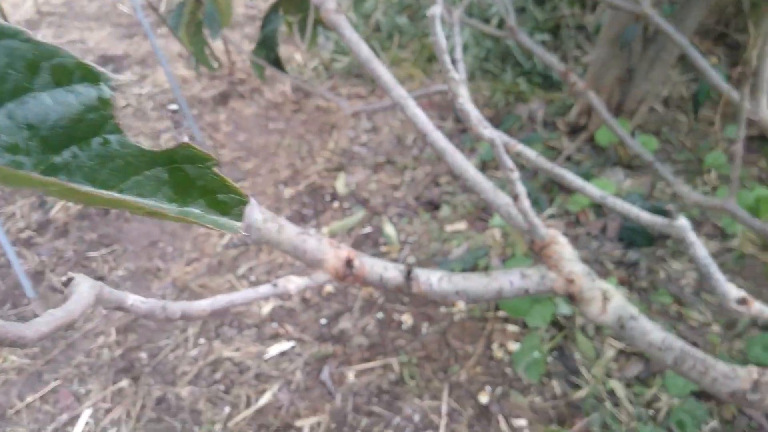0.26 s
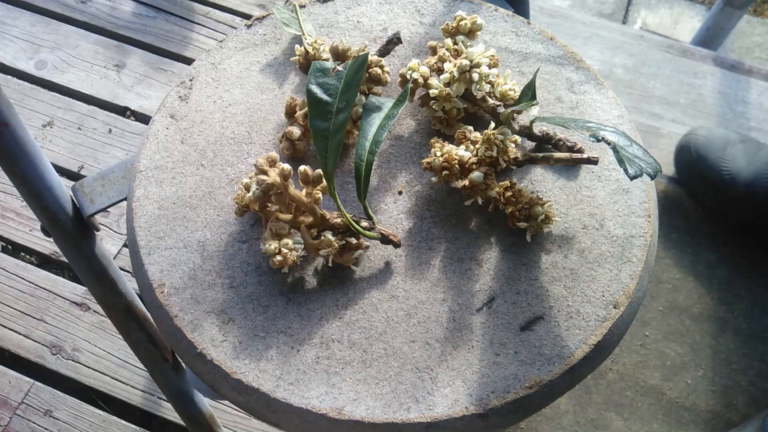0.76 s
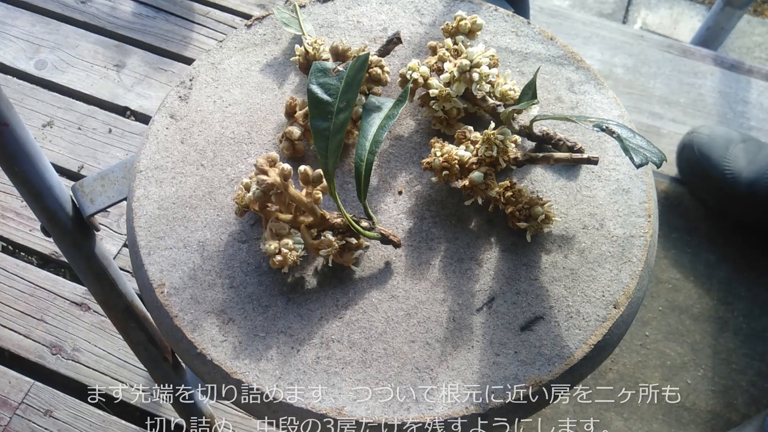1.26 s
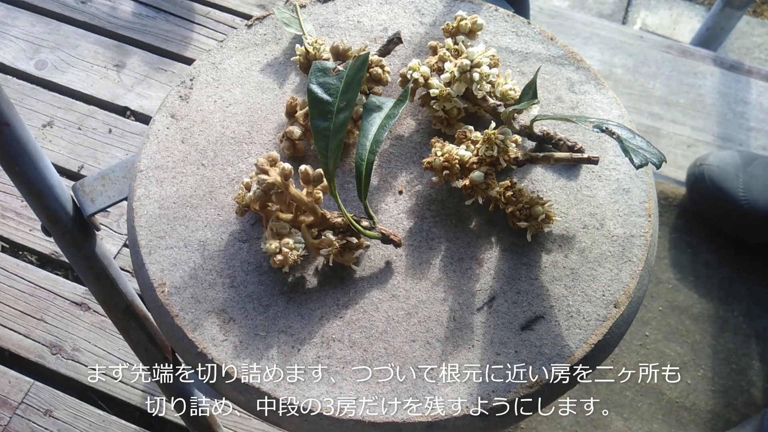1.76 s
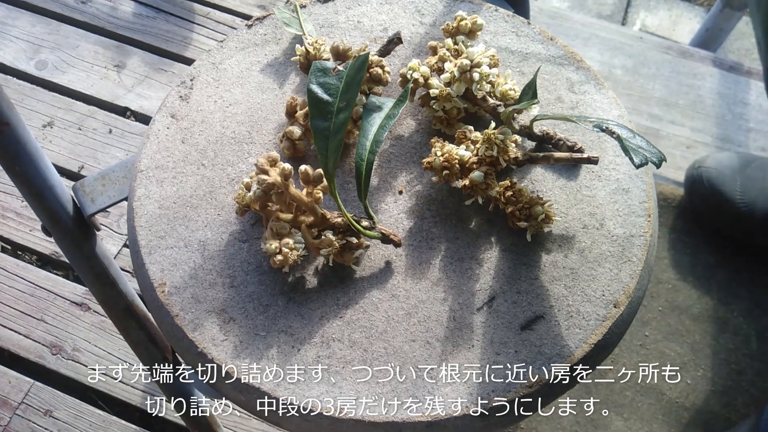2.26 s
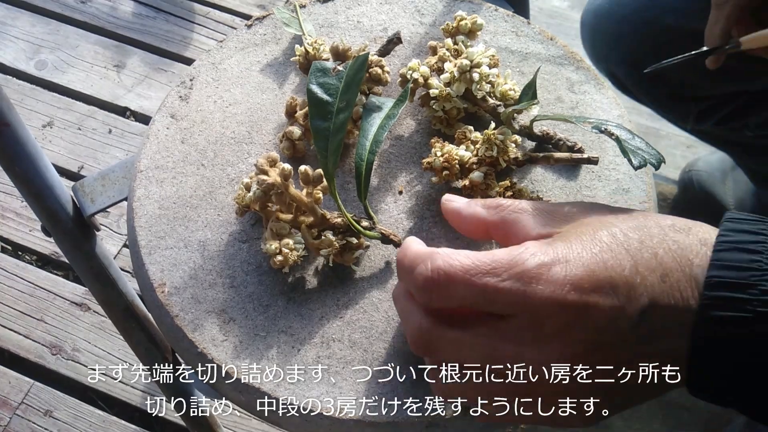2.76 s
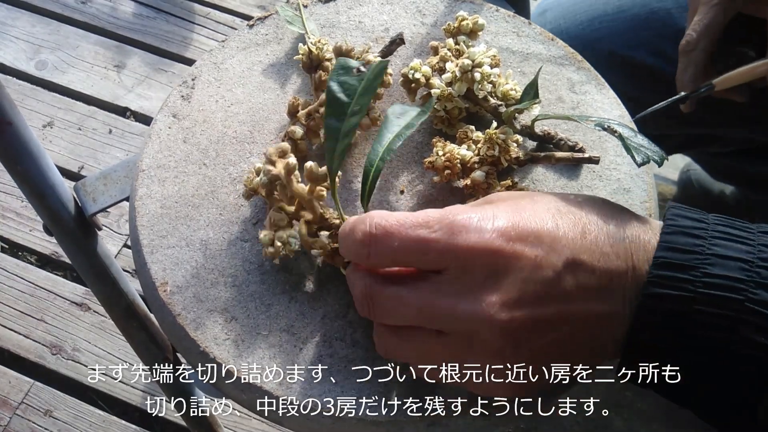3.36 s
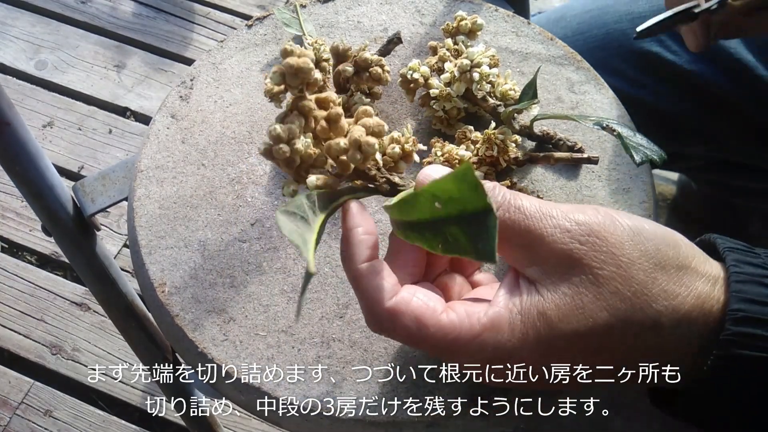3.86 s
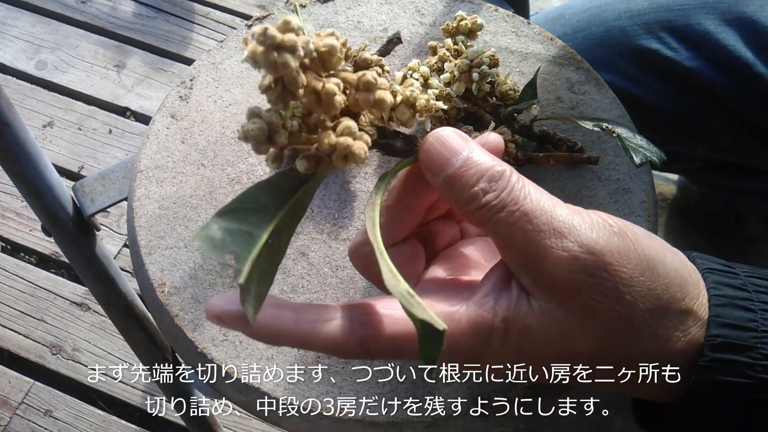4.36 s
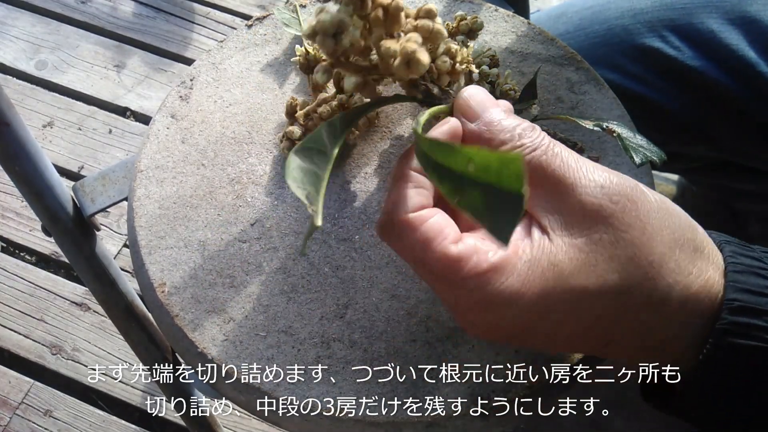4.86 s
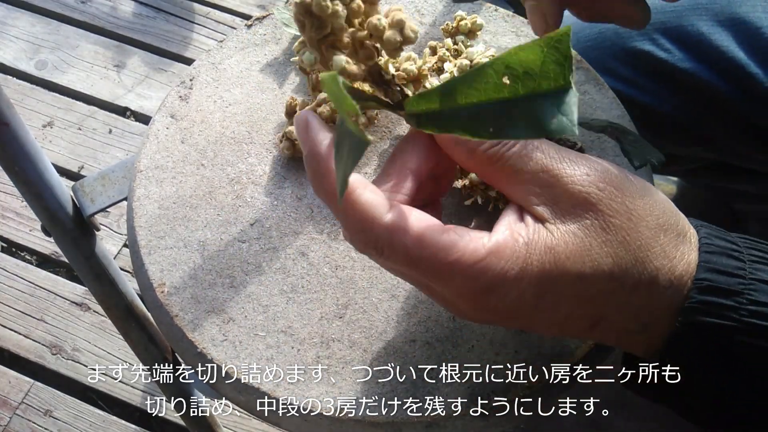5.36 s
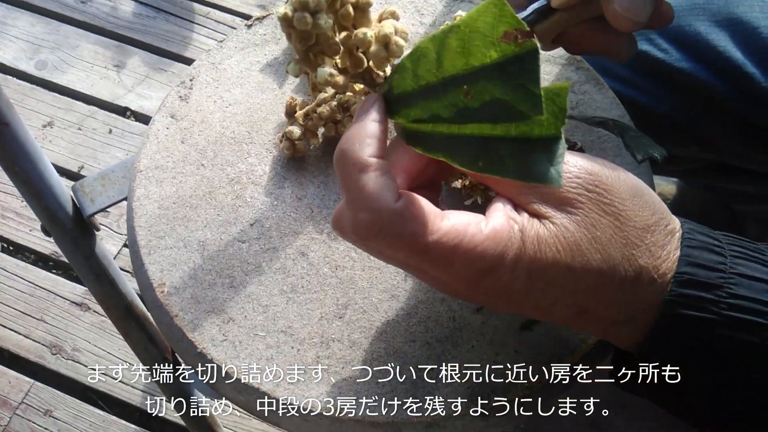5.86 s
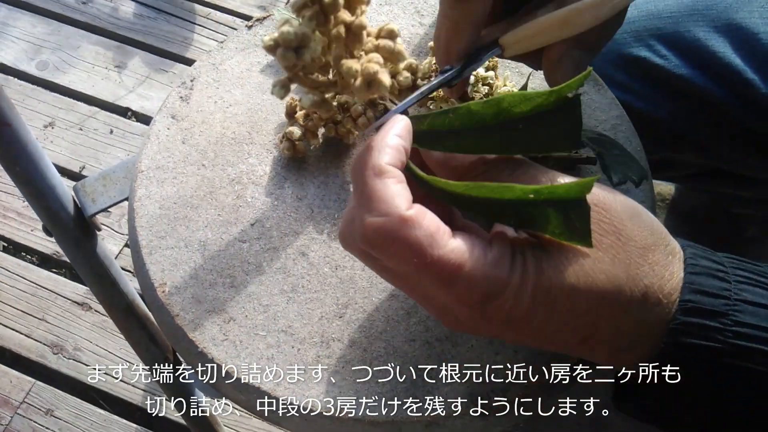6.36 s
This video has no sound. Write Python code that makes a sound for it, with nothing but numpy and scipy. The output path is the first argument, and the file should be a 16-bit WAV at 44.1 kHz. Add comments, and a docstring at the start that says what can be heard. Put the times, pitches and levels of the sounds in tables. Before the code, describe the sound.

Faint garden air drops out and gives way to a louder outdoor hiss and hum, with low wind puffs on the microphone. Close by, the wooden handles of small shears clack, something softly bumps the table, and the shears clack again. Crisp, uneven snaps follow as a flower cluster is trimmed, mixed with light leaf rustling, another gust and a softer clack.

```python
"""Small garden shears trim a flower cluster at an outdoor stone table. Wooden handles clack off to the
right; stems snap fibre by fibre, leaves rustle in the hand, and the deck and house wall answer briefly.
Underneath, quiet garden air fades out, then the louder air of the deck fades in. Puffs of wind touch
the left microphone, something soft bumps the table, and a far bird gives one note at the end."""
import sys
import numpy as np
from scipy import signal
from scipy.fft import rfft, irfft, next_fast_len
from scipy.io import wavfile
from scipy.ndimage import uniform_filter1d, map_coordinates

SR = 44100
rng = np.random.default_rng(int(sys.argv[2]) if len(sys.argv) > 2 else 0)


def master_out(mix):
    """Clip the mix to full scale and print it as 16-bit PCM to the path in sys.argv[1]."""
    frames = np.transpose(np.atleast_2d(mix))
    ceiling = np.clip(frames, -1, 1)
    pcm = np.round(ceiling * 32767).astype(np.int16)
    wavfile.write(sys.argv[1], SR, pcm)


N = 291060
TIME = np.arange(N) / SR
RING = np.arange(SR // 3) / SR  # time within one short event [s]


def amp(db):
    """Decibels to gain."""
    return 10 ** (np.asarray(db) / 20)


def pan(db):
    """Stereo gains with the left side db louder than the right."""
    return amp([[db / 2], [-db / 2]])


def unit_rms(x):
    """x at rms 1."""
    return x / np.sqrt(np.mean(x ** 2) + 1e-20)


def unit_energy(x):
    """Each channel at energy 1."""
    return x / np.linalg.norm(x, axis=-1, keepdims=True)


def along(points, hz):
    """Read a curve of (frequency [Hz], value) points on a log axis."""
    freqs, values = np.transpose(points)
    return np.interp(np.log(hz + 1), np.log(freqs), values)


def hump(s, length):
    """A smooth rise and fall, 1 at s seconds."""
    return np.exp(-((TIME - s) / length) ** 2)


def wobble(rate):
    """A smooth random drift, rate knots a second."""
    return map_coordinates(rng.standard_normal(int(N * rate / SR) + 4), [TIME * rate])


def filtered(x, response):
    """EQ x with a response given as a function of frequency."""
    n = x.shape[-1]
    padded = next_fast_len(n + 8192, real=True)
    return irfft(rfft(x, padded) * response(np.fft.rfftfreq(padded, 1 / SR)), padded)[..., :n]


def causal(gain):
    """The minimum-phase response with this gain: no ringing ahead of the attack."""
    cepstrum = irfft(np.log(gain + 1e-6))
    half = len(cepstrum) // 2
    return np.exp(rfft(np.r_[cepstrum[0], 2 * cepstrum[1:half]], 2 * half))


def whiten(x, width_hz=220):
    """Even out a burst's tone so every band has about the same energy; this can sharpen its attack."""
    spectrum = rfft(x)
    bins = max(3, int(width_hz * x.shape[-1] / SR))
    power = abs(uniform_filter1d(abs(spectrum) ** 2, bins))
    return unit_energy(irfft(spectrum / np.apply_along_axis(causal, -1, np.sqrt(power))))


def add(track, s, sound):
    """Mix a sound in at s seconds."""
    part = track[:, round(s * SR):][:, :sound.shape[-1]]
    part += sound[..., :part.shape[1]]


def coloured(x, spectrum, body_db, fizz_db):
    """Thick, soft things add body below 2 kHz; thin, brittle ones add fizz above 8 kHz."""
    body = lambda hz: body_db * along([(1950, 0.85), (2900, 0.0078)], hz)
    fizz = lambda hz: fizz_db * along([(8100, 0.02), (9100, 1.0)], hz)
    return filtered(x, lambda hz: causal(amp(along(spectrum, hz) + body(hz) + fizz(hz))))


def placed(x, pan_db, lag, near_db, echo_db, t60):
    """Direct sound (left ear lag s late), quick bounces off hands, table and deck, and a short echo."""
    direct = np.zeros((2, len(RING)))
    direct[0, round(abs(lag) * SR)] = direct[1, 0] = 1
    near = unit_energy(rng.standard_normal(direct.shape) * RING * np.exp(-RING / 0.0016))
    tail_envelope = amp(-60 * RING / t60) * (1 - np.exp(-RING / 0.0025))
    tail = whiten(rng.standard_normal(direct.shape) * tail_envelope)
    tail_eq = [(300, 1.5), (2000, 3), (8000, 4.0), (14000, 2.0)]
    tail = filtered(tail, lambda hz: causal(amp(along(tail_eq, hz))))
    paths = whiten(direct + amp(echo_db) * (amp(near_db) * near + tail))
    return signal.fftconvolve(x[None], paths, axes=1) * pan(pan_db)


def noise_bed(spectrum, pan_db, lag=.00036):
    """Stereo noise of rms 1, narrow in the low mids and wide elsewhere, the left side lag s late."""
    # likeness of the two sides: (frequency [Hz], correlation [0-1])
    likeness = [(30, 0.2), (120, 0.69), (270, 0.95), (600, 0.84), (1200, 0.018), (10000, 0)]
    spread = lambda hz: np.arccos(np.clip(along(likeness, hz), -1, 1)) / 2
    mid_side_eq = lambda hz: amp(along(spectrum, hz)) * [np.cos(spread(hz)), np.sin(spread(hz))]
    mid, side = filtered(rng.standard_normal((2, N)), mid_side_eq)
    left = np.roll(mid + side, round(lag * SR))
    return unit_rms(np.array([left, mid - side]) * pan(pan_db))


def air(gain_db=2):
    """Rumble and distant hum under a smooth hiss; the garden fades out, a gap, then the deck fades in."""
    # tone of each outdoor layer: (frequency [Hz], level [dB])
    rumble_eq = [(15, -7.5), (45, 3), (85, -6.5), (125, -3), (190, -10.5), (350, -29.5), (1500, -41.5)]
    hum_eq = [(40, -22), (140, -7), (200, -5), (275, 0.5), (340, -3), (450, -5.5), (600, -9), (790, -6),
              (1050, -15), (2500, -21.5), (8000, -64)]
    hiss_eq = [(20, -12), (400, -13), (1000, -1.5), (2000, 1.5), (4000, 0), (6000, -2), (8200, 1),
               (8700, -5.5), (15500, -7)]
    # base mix of the air in each place: (rumble [dB], hum [dB], hiss [dB])
    garden_mix = (-78, -74, -74)
    deck_mix = (-58.5, -61.5, -61.5)
    garden = np.interp(TIME, [.67, .70], [1, 0])
    deck = np.interp(TIME, [.756, .759, .84, .96], [0, .28, .48, 1])
    rumble_fade, hum_fade, hiss_fade = (garden * amp(garden_db) + deck * amp(deck_db)
                                        for garden_db, deck_db in zip(garden_mix, deck_mix))
    # the rumble is weak until the breeze sets in, and builds towards the second gust
    calm_db = np.interp(TIME, [.7, .76, .96, 1.03], [0, -3, -5.5, -0.5])
    rumble = amp(calm_db + 3.3 * hump(4.0, 1.0) + 1.44 * wobble(5.3)) * noise_bed(rumble_eq, pan_db=3)
    # hum and hiss each swell once and ebb
    hum = amp(3.5 * hump(5.56, 0.96) + 0.98 * wobble(9.8)) * noise_bed(hum_eq, pan_db=-2.5)
    hiss = amp(2.5 * hump(2.68, 1.17) + 0.45 * wobble(7.1)) * noise_bed(hiss_eq, pan_db=0.35)
    return amp(gain_db) * (rumble_fade * rumble + hum_fade * hum + hiss_fade * hiss)


def bird(s=6.505, pitch_hz=3450, db=-61, length=0.014):
    """One faint whistled note from far off in the garden."""
    return amp(db - 12.0 * ((TIME - s) / length) ** 2) * np.sin(2 * np.pi * pitch_hz * TIME)


def gust_push(s=1.029, rise=0.18, push_db=-29.5, pan_db=-5):
    """The first gust presses on the microphones, a deep push that slowly lets go."""
    age = np.maximum(TIME - s, 0) / rise
    return amp(push_db) * age * np.exp(1 - age) * pan(pan_db)


def wind_puffs(lee_db=-17, usual_length=0.04):
    """Each puff shakes the left microphone; the right one lies in the lee."""
    # wind on the microphone: (time [s], level [dB], length [s])
    puffs = [(0.831, -48, 0.021), (1.12, -45, 0.16), (1.225, -31, 0.015), (1.283, -37, 0.043),
             (4.465, -32, .033), (4.496, -28.5, 0.024), (4.51, -41, .17), (4.783, -44, 0.062)]
    # tone of a long puff: (frequency [Hz], level [dB])
    buffet_eq = [(15, -29), (45, 11), (80, 1.5), (140, -1.5), (230, -17), (330, -30), (550, -56),
                 (2000, -90)]
    out = np.zeros((2, N))
    for s, db, length in puffs:
        size = min(length / usual_length, 1) ** .3  # a short puff reaches higher in pitch
        eddies = filtered(rng.standard_normal((2, len(RING))), lambda hz: amp(along(buffet_eq, hz * size)))
        envelope = np.exp(-((RING - RING.mean()) / (0.64 * length)) ** 2)
        puff = unit_energy(eddies * envelope) * np.sqrt(length * SR)
        add(out, s - RING.mean(), amp(db) * puff)
    return out * amp([[0], [lee_db]])


def table_bumps(gain_db=27):
    """Something soft jostles the table, ringing its modes at slightly new strengths each time."""
    # soft hits: (time [s], relative level [dB])
    bumps = [(1.7640, -41), (1.7747, -39.5), (1.7819, -44)]
    # modes of the table: (frequency [Hz], level [dB], t60 [s])
    modes = [(128.5, 0, 0.074), (183, -3, 0.062), (219, 1, 0.053), (286, 0.5, 0.12), (510, -4, .05),
             (676, -2.5, 0.023), (1140, -24, 0.024)]
    out = np.zeros((2, N))
    for s, db in bumps:
        partials = (amp(mode_db + rng.standard_normal() - 60 * RING / t60)
                    * np.sin(2 * np.pi * (hz * RING + rng.random())) for hz, mode_db, t60 in modes)
        thud = unit_energy(sum(partials))
        heard = placed(thud, pan_db=-3.0, lag=0.00029, near_db=-6, echo_db=-20, t60=0.12)
        add(out, s, amp(db + gain_db) * heard)
    return filtered(out, lambda hz: causal(amp(along([(800, -2), (1500, 7.0), (5000, -25)], hz))))


def leaf_rustle(grains_per_s=2500):
    """Leaves and buds rub in the hand: fine grains that come in small clumps and swell with each stroke."""
    # the hand shifts the cluster: (time [s], level [dB], length [s])
    strokes = [(3.243, -62, 0.054), (3.76, -56.5, 0.091), (4.025, -52, 0.013), (4.279, -54, .02),
               (5.125, -52, 0.023), (5.456, -61, 0.14), (6.22, -53.5, 0.12)]
    # tone of rubbing leaves: (frequency [Hz], level [dB])
    leaf_eq = [(200, 10.5), (900, 8), (2200, 3), (4500, 4), (8000, -2), (9000, -7), (15000, -6)]
    grains = rng.standard_normal((2, N)) * (rng.random(N) < grains_per_s / SR)
    clumps = amp(4 * np.tanh(wobble(22)) + 4 * np.tanh(wobble(140)))
    power = sum(amp(db) ** 2 * hump(s, length) for s, db, length in strokes)
    return np.sqrt(power) * unit_rms(filtered(grains * clumps, lambda hz: amp(along(leaf_eq, hz))))


def stem_snaps(gain_db=25, usual_hz=6040, ring_db=6.5, ring_width=0.39):
    """A stem gives way in a quick volley of breaking fibres and rings at its own pitch."""
    # stems and buds snapping; the 3.0117 s row is the bright echo of the snap just before:
    # (time [s], relative level [dB], pan left [dB], tearing time [s], pitch [Hz], body [dB], echo [dB])
    snaps = [(0.558, -68, 4, 0.00036, 6960, 8, -11), (2.6911, -45, 1, 0.0013, 2200, 2, -2),
             (2.86, -53, -2, 0.00057, 4000, -5, -1), (3.008, -31.5, -0.5, .00021, 3800, -11, 1.5),
             (3.0117, -38.5, 9, 0.00052, 7400, -19, 13), (3.5679, -21, -3.5, .00013, 4160, -3.5, -5),
             (4.0311, -38, -6.5, 0.00032, 11000, -1, -4), (4.04, -40, -16, .00024, 15000, -6, -9),
             (4.0477, -35.5, -1, 0.00062, 6700, 7, 3), (4.0561, -40.5, 11, 0.00063, 7400, 1, -12),
             (4.059, -43, -3, 0.0021, 1480, 13.5, 9), (4.263, -50, 4, 0.0031, 7000, -7, 3),
             (4.647, -48, 2, 0.0012, 7500, -5, -3), (5.3317, -42, 1, 0.0002, 6500, -23, -7),
             (6.1156, -40.5, 8, 0.00057, 2600, -3.5, -4), (6.1232, -48, -2, .0006, 3500, -3, -12),
             (6.2097, -43, 3, 0.0023, 6500, 0, -4)]
    # tone of a breaking stem: (frequency [Hz], level [dB])
    stem_eq = [(100, -1), (400, 0), (900, -1), (1900, 3.5), (2700, -1), (3500, 0), (4800, -4), (7200, 2),
               (9500, 1.5), (14000, -3.5), (16000, -5)]
    out = np.zeros((2, N))
    for s, db, pan_db, tearing, pitch_hz, body_db, echo_db in snaps:
        fizz_db = -4 + 4.5 * np.log2(pitch_hz / usual_hz)  # a thin, high-pitched stem fizzes more
        sizes = rng.standard_normal(len(RING)) * amp(2.1 * rng.standard_normal(len(RING)))
        fibres = whiten(sizes * RING ** 2 * np.exp(-2 * RING / tearing), width_hz=730)
        resonance = lambda hz: causal(amp(ring_db / (1 + ((hz / pitch_hz - 1) / ring_width) ** 2)))
        snap = coloured(filtered(fibres, resonance), stem_eq, body_db, fizz_db)
        lag = .00036 * (pan_db < 0)  # what breaks on the right reaches the left side late
        heard = placed(snap, pan_db, lag, near_db=7.5, echo_db=echo_db, t60=0.15)
        add(out, s - tearing, amp(db + gain_db) * heard)
    return out


def shear_clacks(gain_db=21, crack_time=0.0018):
    """The shears knock shut: a sharp crack rings the handles for a moment."""
    # hard wooden clacks:
    # (time [s], relative level [dB], body [dB], fizz [dB], pan left [dB], brightness [dB])
    clacks = [(1.451, -22.5, 5, -8.5, -2, -4), (2.6200, -26, 5.5, -8, -3.5, -4),
              (5.0008, -31, 8, 0.5, -4, -1.5)]
    # resonances of the handles and blades: (frequency [Hz], width [Hz], level [dB])
    modes = [(950, 85, 21), (1814, 173, 13), (1900, 96, 9), (2720, 89, -7), (3145, 250, 19),
             (4686, 127, 15.5), (6600, 300, 4), (7900, 590, 9)]
    # tone of the crack: (frequency [Hz], level [dB])
    crack_eq = [(100, -21), (450, -13), (680, -8), (900, -2.5), (1150, -2), (1800, 6.5), (2700, -4.5),
                (4700, -2.5), (5600, 2), (8200, -2.5), (12000, -1), (16000, -6)]
    handles = lambda hz: np.sqrt(1 + sum(amp(level) ** 2 / (1 + (2 * (hz - centre) / width) ** 2)
                                         for centre, width, level in modes))
    out = np.zeros((2, N))
    for s, db, body_db, fizz_db, pan_db, bright_db in clacks:
        crack = whiten(rng.standard_normal(len(RING)) * np.exp(-RING / crack_time))
        # a harder contact favours the second resonance over the first
        contact = lambda hz: amp(bright_db * along([(1000, -0.82), (1700, 0.81), (2600, -0.21)], hz))
        ringing = filtered(crack, lambda hz: causal(handles(hz) * contact(hz)))
        knock = coloured(ringing, crack_eq, body_db, fizz_db)
        heard = placed(knock, pan_db, lag=.00043, near_db=6.5, echo_db=-6.5, t60=0.19)
        add(out, s, amp(db + gain_db) * heard)
    return out


def scene():
    """Shears, plant and table in the open air."""
    foreground = shear_clacks() + stem_snaps() + table_bumps() + leaf_rustle()
    return foreground + wind_puffs() + gust_push() + bird() + air()


def record(dry):
    """A steep low-pass takes off the very top of the treble."""
    top_hz = 15700
    return filtered(dry, lambda hz: 1 / np.sqrt(1 + (hz / top_hz) ** 120))


dry = scene()
out = record(dry)
master_out(out)
```